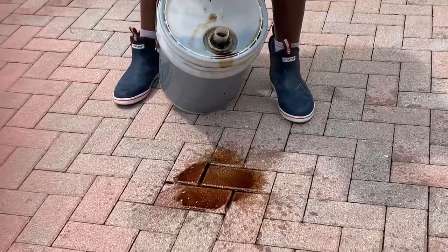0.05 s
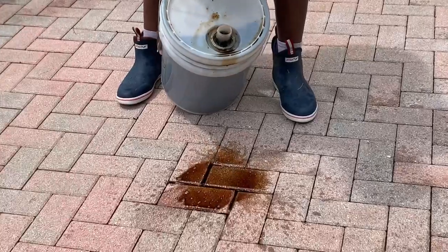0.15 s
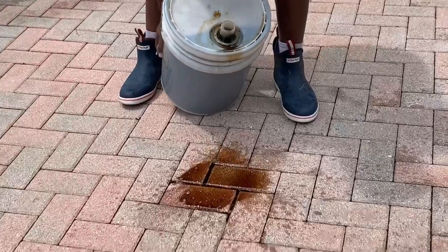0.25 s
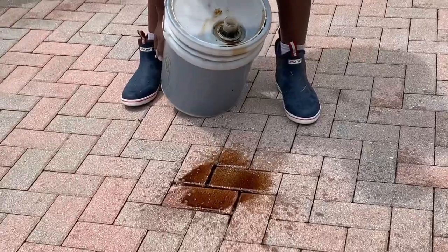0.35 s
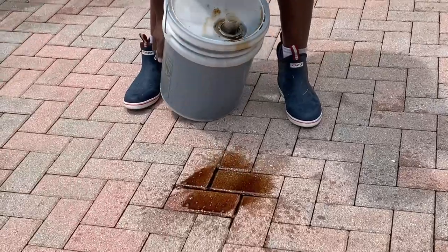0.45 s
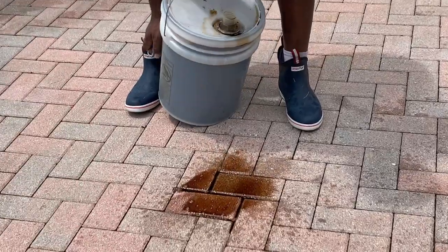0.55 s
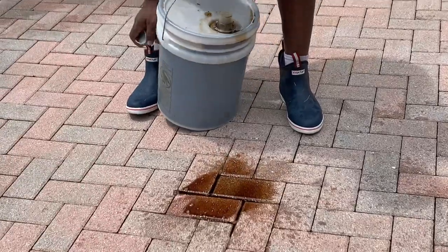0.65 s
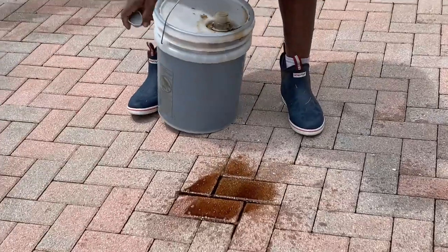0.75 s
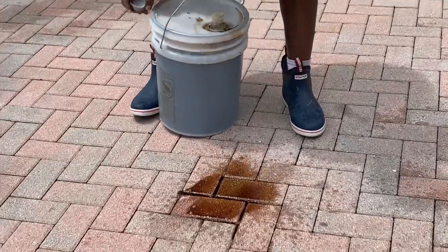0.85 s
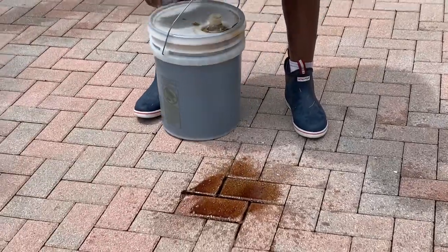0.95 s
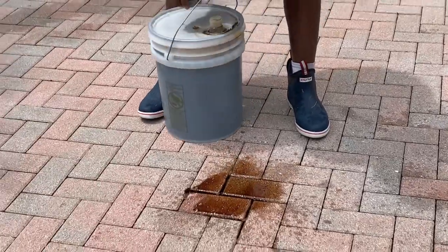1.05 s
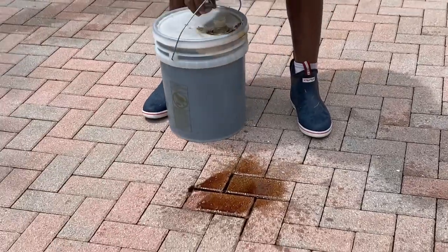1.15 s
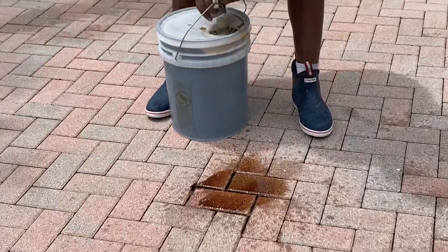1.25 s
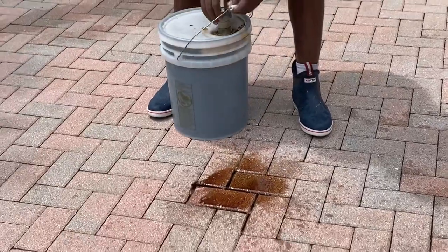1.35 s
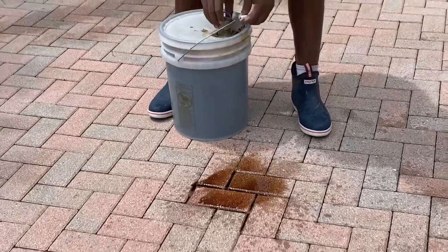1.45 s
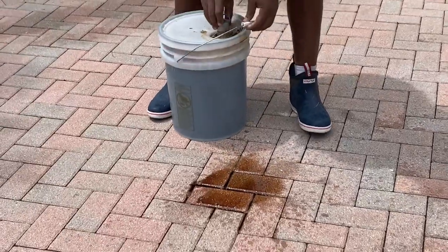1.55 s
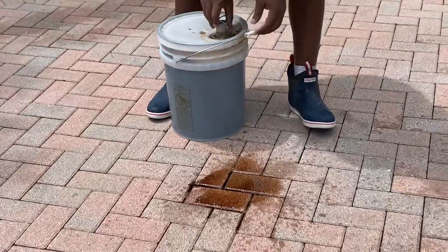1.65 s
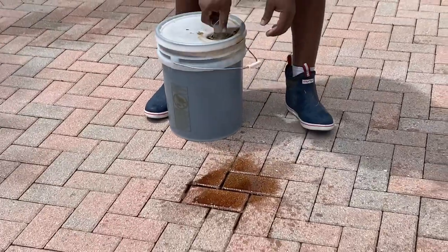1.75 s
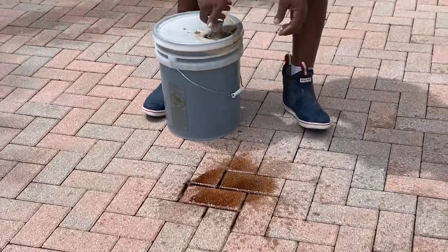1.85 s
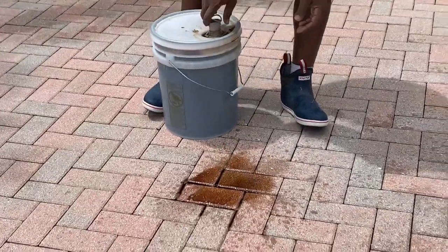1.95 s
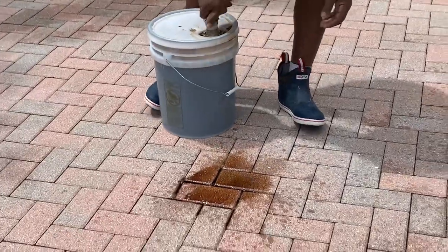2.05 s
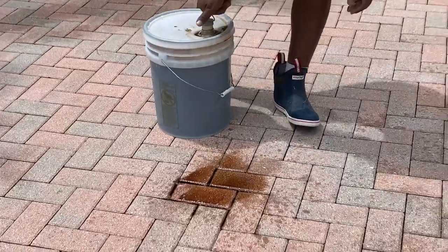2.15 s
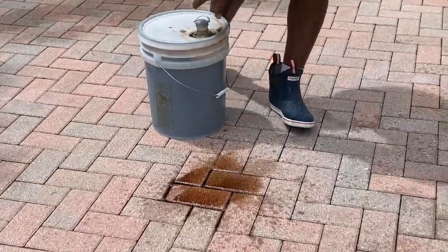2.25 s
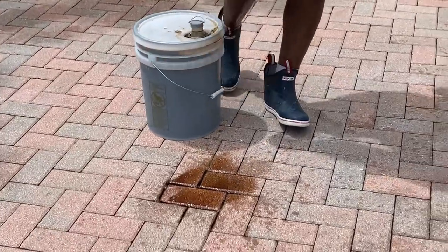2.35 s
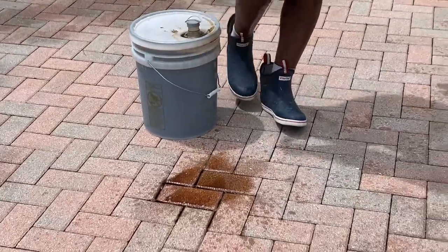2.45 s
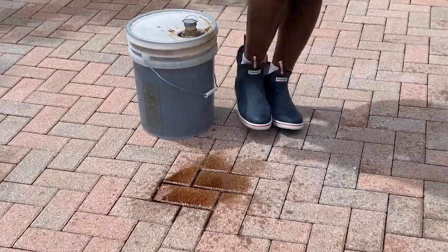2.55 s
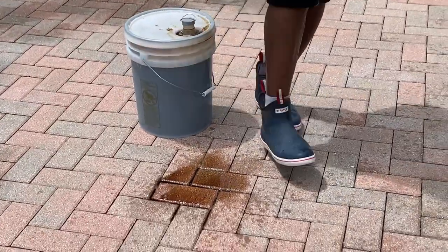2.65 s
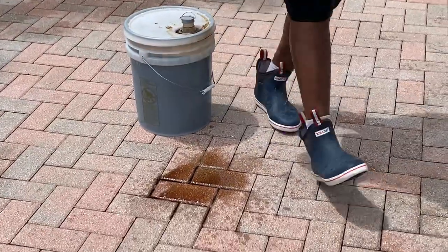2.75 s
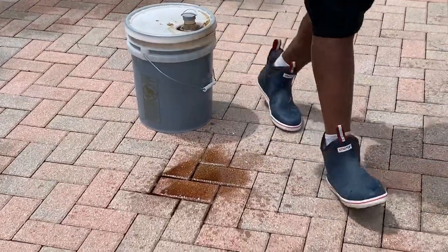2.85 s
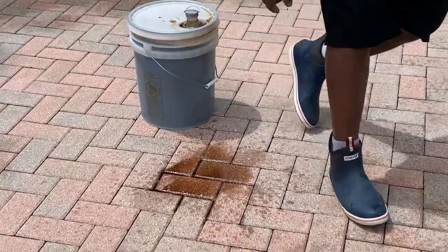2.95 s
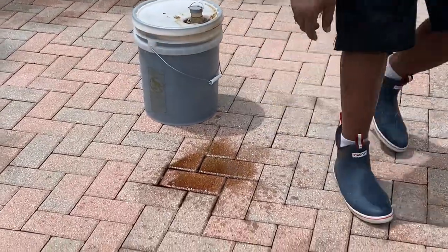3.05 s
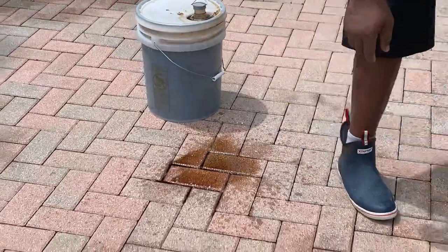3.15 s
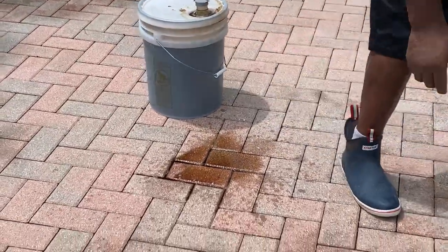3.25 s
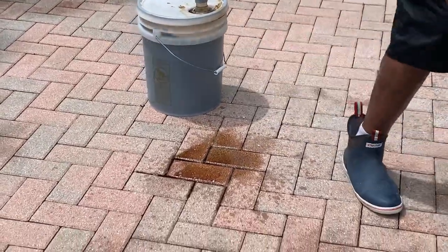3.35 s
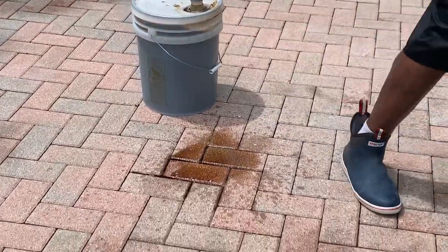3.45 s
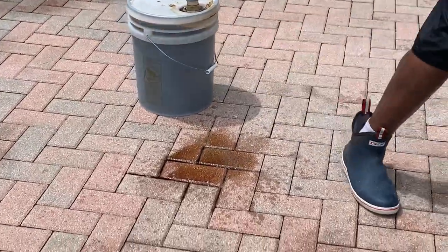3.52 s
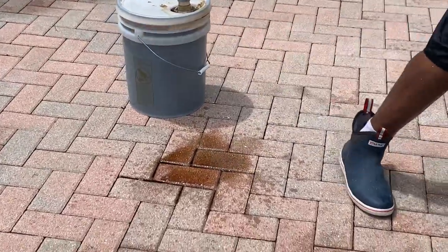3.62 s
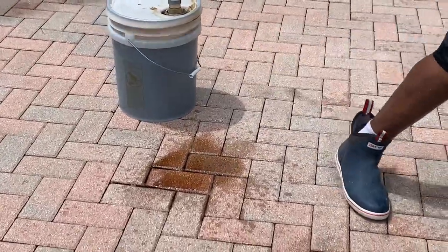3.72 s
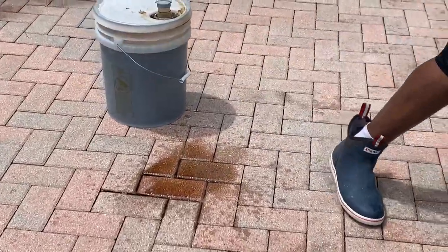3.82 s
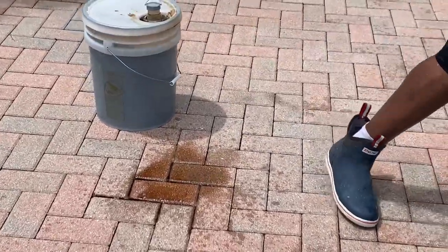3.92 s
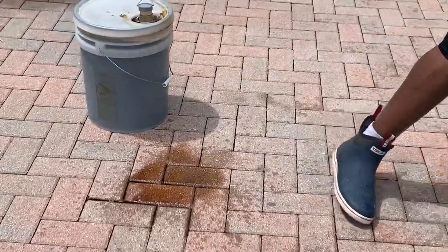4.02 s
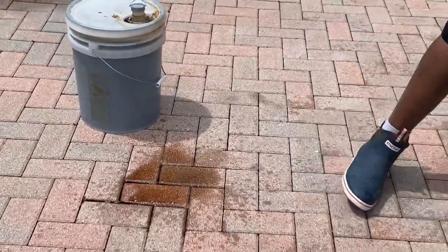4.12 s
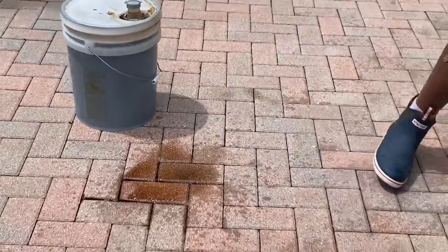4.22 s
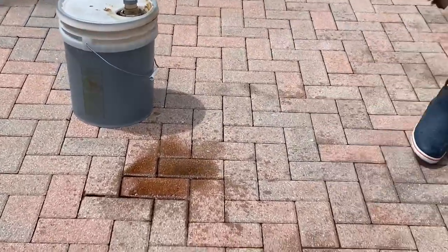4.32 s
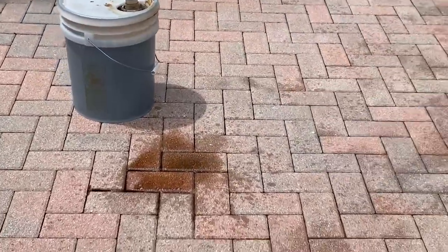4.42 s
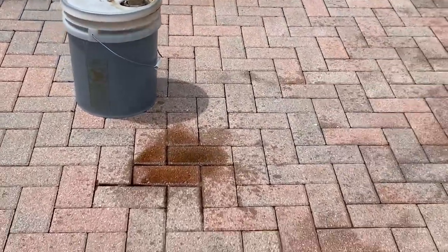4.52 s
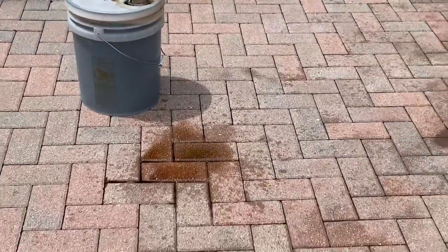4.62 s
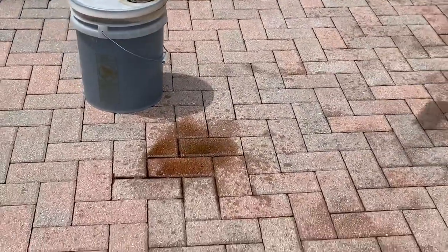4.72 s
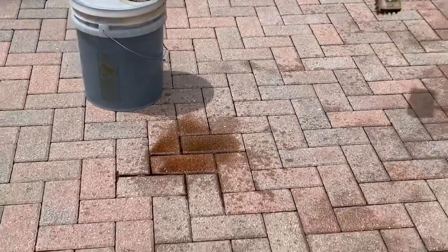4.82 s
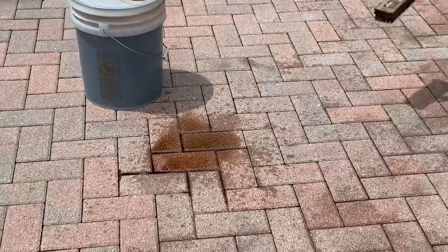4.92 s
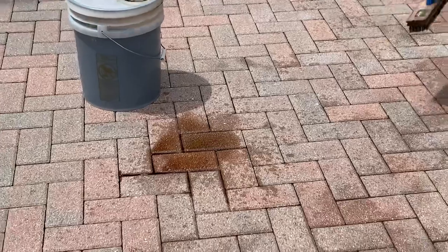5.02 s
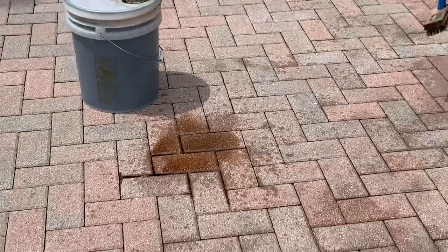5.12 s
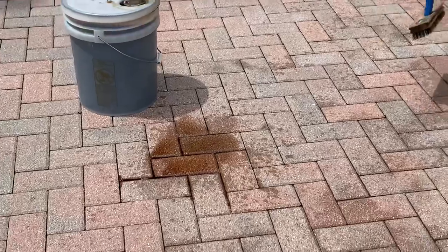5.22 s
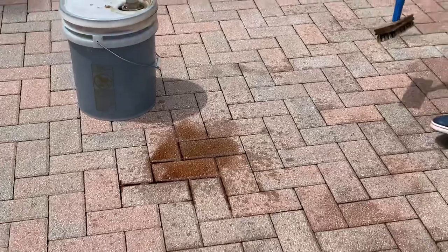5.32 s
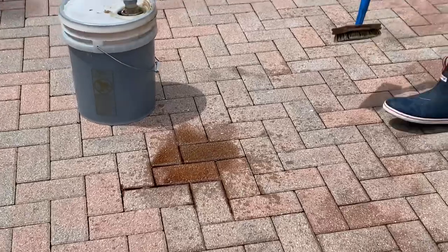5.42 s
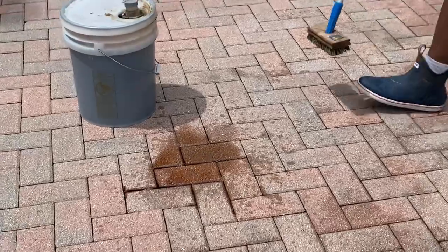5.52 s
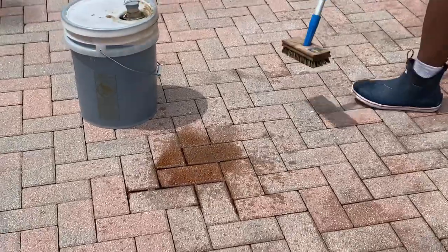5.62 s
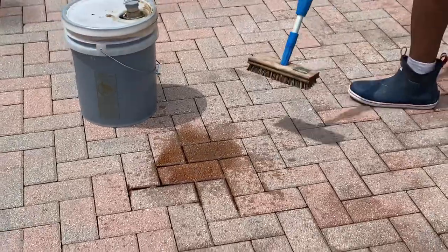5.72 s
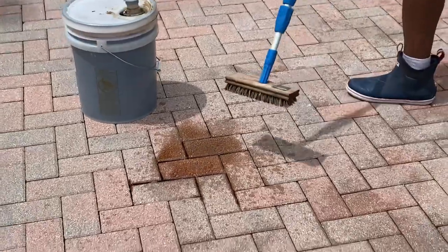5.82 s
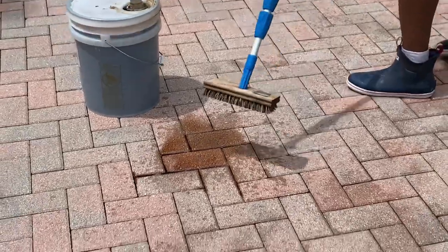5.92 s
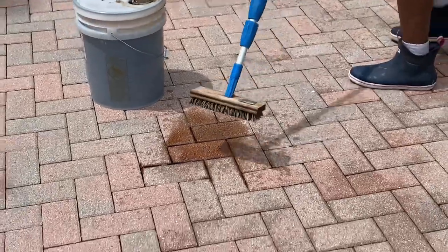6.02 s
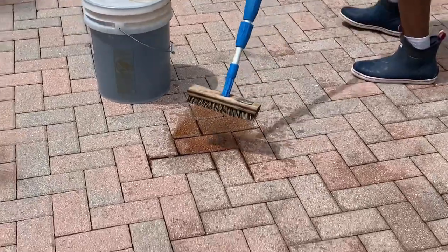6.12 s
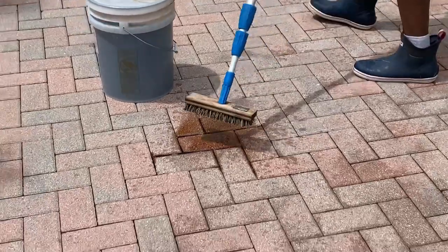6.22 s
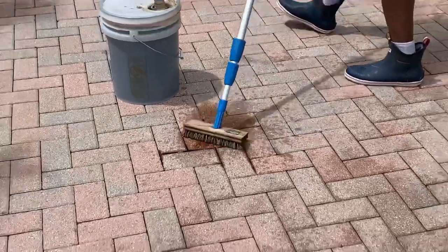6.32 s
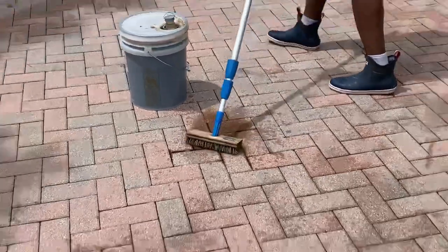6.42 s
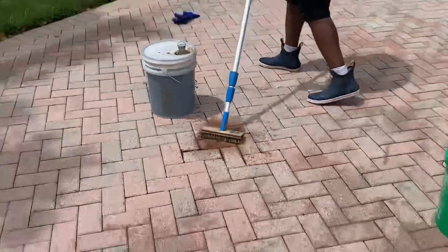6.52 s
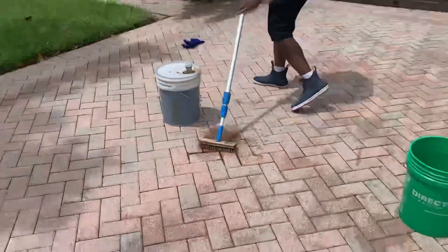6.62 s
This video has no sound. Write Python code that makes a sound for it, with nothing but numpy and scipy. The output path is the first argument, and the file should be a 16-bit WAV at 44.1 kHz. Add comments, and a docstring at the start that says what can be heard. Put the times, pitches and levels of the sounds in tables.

```python
"""A brick-paved yard, hand-held microphone: far off a small engine hums in low exhaust orders over a wash.
Air buffets the microphone as lumpy low noise, and its two ports hear the treble out of step.
Close by, rubber boots roll grit and thump. A plastic bucket lands and rings in its modes, its wire handle
chatters on the wall and its spout is pulled out.
Last, a stiff deck brush lands and scrubs in quick strokes: hiss of flicking tips over a rasp of brick."""
import sys
import numpy as np
from scipy import signal
from scipy.fft import rfft, irfft
from scipy.io import wavfile

SR = 44100
rng = np.random.default_rng(int(sys.argv[2]) if len(sys.argv) > 2 else 0)


def store_wav(level_fs):
    """Save 16-bit WAV to argv[1]."""
    pcm = np.round(np.clip(np.atleast_2d(level_fs), -1, 1) * 32767)
    wavfile.write(sys.argv[1], SR, pcm.T.astype(np.int16))


N = 294147
TIME = np.arange(N) / SR
FREQS = np.maximum(np.arange(N // 2 + 1) * SR / N, 1)


def from_db(db):
    """Decibels to gain."""
    return 10 ** (np.asarray(db) / 20)


def rms_one(x):
    """Scale to unit power."""
    return x / np.sqrt(np.mean(x ** 2) + 1e-20)


def in_time(rows):
    """The second column of a time curve, sample by sample."""
    s, value = np.transpose(rows)
    return np.interp(TIME, s, value)


def per_bin(points):
    """A table read along log frequency."""
    hz, value = np.transpose(points)
    return np.interp(np.log(FREQS), np.log(hz), value)


def drift(rate):
    """Random wander: straight lines between knots of spread 1, `rate` knots a second."""
    knots = rng.standard_normal(2000)
    return np.interp(TIME * rate, np.arange(2000), knots)


# how alike the two ports hear diffuse sound: f/Hz, likeness (1 = the same)
PORT_LIKENESS = [(60, 0.91), (150, 0.64), (300, 0.32), (600, 0.54), (1200, 0.0074), (2500, 0.1),
                 (5000, 0.039), (7800, 1), (16000, 1)]


def colour(pair, spectrum):
    """Two unrelated signals become a stereo sound with this spectrum; rms 1."""
    mid, side = rfft(pair) * from_db(per_bin(spectrum))
    alike = np.clip(per_bin(PORT_LIKENESS), -1, 1)
    shared = np.sqrt(1 + alike) * mid
    opposed = np.sqrt(1 - alike) * side * [[1], [-1]]
    return rms_one(irfft(shared + opposed, N))


def noise(spectrum):
    """Smooth stereo noise."""
    return colour(rng.standard_normal((2, N)), spectrum)


def grains(per_s):
    """Random tiny impacts of uneven size."""
    born = rng.random(N) < per_s / SR
    return born * rng.standard_normal((2, N))


def strikes(times, gains):
    """One click at each time."""
    out = np.zeros(N)
    out[np.round(np.asarray(times) * SR).astype(int)] = gains
    return out


def ring(clicks, hz, t60):
    """A unit click sets a decaying sine of starting height 1 ringing in a two-pole resonator."""
    r = from_db(-60 / (t60 * SR))
    w = 2 * np.pi * hz / SR
    return signal.lfilter([0, np.sin(w)], [1, -2 * r * np.cos(w), r * r], clicks + 1e-18)


def fade(clicks, t60):
    """An envelope that jumps at each click and dies away."""
    return signal.lfilter([1], [1, -from_db(-60 / (t60 * SR))], clicks + 1e-18)


def low_rings(rows, t60):
    """Mono low tones, one for each row of t/s, level/dB, f/Hz."""
    return sum(ring(strikes([s], from_db(db)), hz, t60) for s, db, hz in rows)


def soften(x, low_hz=42, soft_hz=420):
    """A soft, heavy contact passes only its lows."""
    return signal.sosfilt(signal.butter(2, [low_hz, soft_hz], "band", fs=SR, output="sos"), x)


def slides(rows, skirt, flatness):
    """Hiss and rasp envelopes of sliding contacts: each speeds up, slows down and trails off."""
    hiss, rasp = np.zeros(N), np.zeros(N)
    for s, rise, fall, hiss_db, rasp_db in rows:
        away = np.abs(TIME - s) / np.where(TIME < s, rise, fall)
        power = (1 + skirt * away ** flatness) ** (-1 / skirt)
        hiss += from_db(hiss_db) ** 2 * power
        rasp += from_db(rasp_db) ** 2 * power
    return np.sqrt(hiss), np.sqrt(rasp)


def glides(rows, width):
    """Uneven bands of noise, `width` a share of the centre pitch, that swell, glide and fade."""
    out = np.zeros((2, N + SR))
    t = TIME[:SR] - TIME[SR // 2]
    for s, half, db, hz, rise in rows:
        lowpass = signal.butter(2, width * hz / 2, fs=SR, output="sos")
        slip = rms_one(signal.sosfilt(lowpass, rng.standard_normal((3, SR))))
        carrier = np.sin(2 * np.pi * hz * (t + rise * t * t / half / 2))
        band = slip * carrier * np.exp(-(t / half) ** 2 / 2)
        start = round(s * SR)
        out[:, start:start + SR] += from_db(db) * (band[0] + band[1:])   # half shared, half each port's own
    return out[:, SR // 2:SR // 2 + N]


def struck(hits, modes):
    """A small body rings at each hit, a little differently in each port."""
    s, hit_db = np.transpose(hits)
    uneven = from_db(rng.normal(0, 0.74, (len(modes), 2, len(s))))
    out = np.zeros((2, N))
    for (hz, db, t60), ports in zip(modes, uneven):
        for side, port in enumerate(ports):
            out[side] += ring(strikes(s, from_db(hit_db + db) * port), hz, t60)
    return out


# bright crack of a hard contact: f/Hz, relative level/dB per Hz
CRACK_SPECTRUM = [(300, -22), (900, -46), (2200, -9), (3300, 1), (5000, -9), (7300, 1), (8500, 10.5),
                  (10500, 4.5), (12000, 9.5), (13500, 9.5), (15000, 7.5), (16000, -33)]
# duller body of the same contact: f/Hz, relative level/dB per Hz
DULL_SPECTRUM = [(150, -7), (400, -10), (800, 2), (1200, 2.5), (1600, -4), (2200, 3.5), (3200, -3.5),
                 (5000, -5), (7000, -12), (15000, -36)]


def contacts(rows, crack_t60, dull_t60, snap_db=12, burst_t60=0.005, burst_db=-3,
             rattle_t60=0.085, rattle_db=-19, crack_db=-7):
    """Each contact is one sharp snap, a burst that cracks and rattles briefly, and a duller knock."""
    s, bright_db, dull_db = np.transpose(rows)
    hits = strikes(s, from_db(bright_db))
    shape = from_db(per_bin(CRACK_SPECTRUM))
    snap = from_db(snap_db) * irfft(rfft(hits) * shape / shape.mean(), N)
    bright = from_db(burst_db) * fade(hits, burst_t60)
    bright += from_db(crack_db) * fade(hits, crack_t60)
    bright += from_db(rattle_db) * fade(hits, rattle_t60)
    dull = fade(strikes(s, from_db(dull_db)), dull_t60)
    return snap + noise(CRACK_SPECTRUM) * bright + noise(DULL_SPECTRUM) * dull


# distant wash of the neighbourhood: f/Hz, relative level/dB per Hz
WASH_SPECTRUM = [(30, -22), (110, 10), (220, 13), (330, 8.5), (430, 3.5), (700, 5), (1000, -0.5),
                 (2200, -2), (3200, -10), (5000, -13), (7500, -19.5), (9000, -21.5), (12000, -25.5),
                 (16000, -30)]
# its course: t/s, level/dB
WASH_COURSE = [(0, -49.5), (1.6, -49.5), (2.4, -51.5), (3.3, -52), (4.3, -50), (6.0, -51), (6.45, -47),
               (6.67, -47.5)]


def neighbourhood(waver_db=1.0, mottle_db=1.5, split_low_hz=800, split_high_hz=2800):
    """A distant wash of noise whose lows, mids and highs waver apart."""
    wash = noise(WASH_SPECTRUM)
    lows = signal.sosfiltfilt(signal.butter(2, split_low_hz, fs=SR, output="sos"), wash)
    below_highs = signal.sosfiltfilt(signal.butter(2, split_high_hz, fs=SR, output="sos"), wash)
    bands = (lows, below_highs - lows, wash - below_highs)
    mottled = sum(band * from_db(mottle_db * drift(12)) for band in bands)
    return from_db(in_time(WASH_COURSE) + waver_db * drift(10)) * mottled


# narrow low tones in the background:
# t/s, half length/s, level/dB, centre f/Hz, rise per half length as a share of the centre
LOW_TONES = [(3.35, .13, -48, 232.7, -0.025), (3.45, 0.45, -44.5, 184.7, -0.015),
             (5.72, 0.121, -39.5, 191.5, -.06), (5.76, .05, -51, 306, -0.0041),
             (5.98, 0.065, -50, 259, 0.025), (6.13, 0.072, -42.5, 232, -0.00075)]


def low_swells():
    """Narrow bands of low noise swell briefly in the background, the same in both ports."""
    return glides(LOW_TONES, width=0.086).mean(axis=0)


# far engine's turning rate: t/s, turns per second
TURN_RATE = [(0, 52.9), (.4, 52.94), (1.0, 52.34), (1.7, 52.28), (2.05, 51.96), (2.55, 52.01), (3.1, 52.73),
             (3.5, 53.39), (5.1, 53.41), (5.8, 52.39), (6.67, 52.64)]
# orders 2 to 6 of the turning rate, each swelling and fading at its own pace: t/s, level/dB
SECOND_ORDER_HUM = [(0, -38), (.2, -35.5), (.8, -39), (1.4, -42.5), (2.85, -38), (3.35, -45), (3.7, -43.5),
                    (4.05, -40.5), (4.4, -32.5), (5.05, -32.5), (5.75, -52), (6.25, -38), (6.67, -43.5)]
THIRD_ORDER_HUM = [(0, -47), (.25, -46), (.95, -47), (1.22, -55), (1.6, -46.5), (2.45, -41), (2.85, -45.5),
                   (3.15, -61), (3.7, -44.5), (4.4, -58), (4.85, -42.5), (5.4, -48), (5.8, -50.5),
                   (6.67, -65)]
FOURTH_ORDER_HUM = [(0, -66), (.6, -72), (1.6, -48), (2.4, -63), (2.85, -46.5), (3.2, -41.5), (3.9, -56.5),
                    (4.45, -51.5), (4.8, -68), (6.25, -48), (6.67, -53.5)]
FIFTH_ORDER_HUM = [(0, -54.5), (.6, -51.5), (1.2, -56), (1.6, -52), (2.3, -64), (2.7, -54), (3.4, -62.5),
                   (4.2, -60.5), (4.8, -53), (5.4, -56.5), (6.67, -59)]
SIXTH_ORDER_HUM = [(0, -64), (.3, -50), (.8, -47.5), (1.3, -58.5), (1.75, -60), (1.98, -50.5), (2.45, -48),
                   (3.1, -54.5), (3.5, -61.5), (3.85, -55), (4.3, -67.5), (4.65, -49), (5.05, -51),
                   (5.5, -55), (6.35, -61.5), (6.6, -50)]
# weak exhaust orders without a course of their own: multiple of the turning rate, level/dB
WEAK_ORDERS = [(1.5, -59), (2.5, -54.5), (3.5, -57), (4.5, -60.5), (5.5, -64), (6.5, -62.5), (7, -72),
               (8, -71.5)]


def engine(hum_waver_db=1.0, waver_db=2.3, wobble=0.043, smear=1.0):
    """Only the low orders of the exhaust pulses carry this far; they waver in the moving air."""
    turn = 2 * np.pi * np.cumsum(in_time(TURN_RATE)) / SR
    courses = [(2, SECOND_ORDER_HUM), (3, THIRD_ORDER_HUM), (4, FOURTH_ORDER_HUM),
               (5, FIFTH_ORDER_HUM), (6, SIXTH_ORDER_HUM)]
    orders = [(k, in_time(course) + hum_waver_db * drift(9)) for k, course in courses]
    orders += [(k, db + waver_db * drift(2.52)) for k, db in WEAK_ORDERS]
    hum = np.zeros(N)
    for k, db in orders:
        # smear and wobble, in radians, leave the orders roughly in step, so the hum throbs
        hum += from_db(db) * np.sin(k * turn + smear * rng.normal() + wobble * drift(25))
    return np.sqrt(2) * hum


def yard(x, t60=0.13, wet_db=-17, dull_hz=5000):
    """Weak, dull scatter from walls and ground."""
    t = TIME[:SR // 2]
    scatter = rng.standard_normal((2, len(t))) * from_db(-60 * t / t60) * (t > .006)
    scatter = signal.sosfilt(signal.butter(1, dull_hz, fs=SR, output="sos"), scatter)
    echo = rms_one(scatter) / np.sqrt(len(t))
    return from_db(wet_db) * signal.fftconvolve(x, echo, axes=1)[:, :N]


# wind on the microphone: f/Hz, relative level/dB per Hz
WIND_SPECTRUM = [(20, -27), (35, -18), (50, 0.5), (65, -1.5), (90, 3.5), (130, -1.5), (200, -14),
                 (300, -18.5), (500, -35.5), (1000, -101)]
# calm at first, then a long gust: t/s, level/dB before a small lift
WIND_COURSE = [(0, -49), (1.2, -44.5), (2.3, -47), (2.75, -46.5), (3.2, -45.5), (4.3, -41), (4.65, -37.5),
               (5.45, -37), (5.85, -40.5), (6.15, -38.5), (6.67, -40)]


def wind(lift_db=1.0, lump_db=0.36):
    """Air buffets the two ports as lumpy low noise."""
    return from_db(in_time(WIND_COURSE) + lift_db + lump_db * drift(7.3)) * noise(WIND_SPECTRUM)


# fingers on the microphone case: t/s, level/dB
CASE_TAPS = [(0.2138, -35), (3.3134, -36.5), (3.399, -45), (3.815, -42.5), (6.034, -40), (6.072, -33.5),
             (6.134, -30.5)]


def taps(start_hz=1000, end_hz=130, glide_s=0.00307, decay_s=0.018, attack_s=0.0011):
    """A tap on the case is a tiny falling chirp: its lows arrive last."""
    t = TIME[:SR // 10]
    hz = end_hz + (start_hz - end_hz) * np.exp(-t / glide_s)
    envelope = np.exp(-t / decay_s) * (1 - np.exp(-t / attack_s))
    chirp = np.sin(2 * np.pi * np.cumsum(hz) / SR) * envelope
    s, db = np.transpose(CASE_TAPS)
    return signal.fftconvolve(strikes(s, from_db(db)), chirp / np.abs(chirp).max())[:N]


# heels and gusts: t/s, level/dB before softening, f/Hz
LOW_THUMPS = [(3.03, -29, 81), (3.315, -32, 137), (3.325, -39, 62), (3.767, -27.5, 138), (4.665, -15, 56),
              (5.18, -23, 74), (5.442, -15.5, 64), (5.514, -14.5, 67.5), (5.522, -24.5, 160),
              (6.077, -25, 116), (6.144, -22.5, 55)]


def thumps():
    """Soft, heavy contacts ring low for a few cycles."""
    return soften(low_rings(LOW_THUMPS, t60=0.12))


DRAG_S, DRAG_ATTACK_S, DRAG_HOLD_S, DRAG_RELEASE_DB_PER_S = 5.506, .012, 0.13, 80


def drag():
    """Pressure of a dragged sole: it bites at once, holds, then eases off."""
    after = TIME - DRAG_S
    release = from_db(-DRAG_RELEASE_DB_PER_S * np.maximum(after - DRAG_HOLD_S, 0))
    return np.clip(after / DRAG_ATTACK_S, 0, 1) * release


# whole sole over brick: f/Hz, relative level/dB per Hz
SCRAPE_SPECTRUM = [(200, -24), (600, 1.5), (1100, -2.5), (1600, -3), (2400, 2), (3400, -1), (5000, -5.5),
                   (7200, -9), (9000, -9), (12000, -16), (16000, -33)]


def scrape(bumps_per_s=6000, rasp_db=-42.5):
    """The dragged sole grinds grit against the brick."""
    return from_db(rasp_db) * drag() * colour(grains(bumps_per_s), SCRAPE_SPECTRUM)


# rubber and plastic on brick:
# t/s, half length/s, level/dB, centre f/Hz, rise per half length as a share of the centre
BRICK_RUBS = [(0.476, 0.054, -58, 2276, 0.029), (0.715, 0.012, -57, 1056, 0.087),
              (0.794, 0.0064, -47, 1450, 0.17), (1.09, 0.03, -57, 2190, 0.012),
              (3.41, 0.008, -49, 480, -0.02), (3.507, 0.0029, -51, 1080, 0.11),
              (3.507, 0.0046, -45.5, 537, 0.011), (3.659, 0.0034, -53, 2540, 0.0011),
              (4.14, 0.02, -56, 1400, 0.02), (4.16, 0.028, -56, 2200, 0.02),
              (4.554, 0.0049, -46.5, 3710, 0.105), (5.053, 0.0072, -47, 2264, 0.17),
              (5.645, 0.038, -51, 2475, 0.016), (6.225, 0.0235, -53, 1198, 0.081)]


def rubs():
    """Rubber and plastic stick and slip on brick: a hoarse, wide band that glides."""
    return glides(BRICK_RUBS, width=0.34)


# grit under the boots and the brush: t/s, relative crack level/dB, dull level/dB
GRIT_TICKS = [(0.786, -54, -44), (2.464, -57, -48), (3.504, -62, -45), (3.775, -64, -52), (3.599, -52, -65),
              (4.015, -65, -47), (4.553, -48, -43), (5.057, -48, -43.5), (5.423, -48, -43),
              (6.018, -51, -52), (6.279, -28.5, -49)]


def ticks(t60=.04):
    """Grit gives dry ticks, each a snap and a duller knock."""
    return contacts(GRIT_TICKS, crack_t60=t60, dull_t60=t60, snap_db=14)


# soles shifting on the pavers: t/s at full speed, rise/s, hiss level/dB
SOLE_SCUFFS = [(0.715, 0.012, -54), (0.799, 0.015, -53), (1.045, 0.037, -56.5), (1.95, 0.13, -56.5),
               (2.22, 0.034, -62.5), (2.52, 0.038, -56.5), (2.93, 0.044, -56.5), (3.395, 0.032, -58),
               (3.84, 0.024, -58.5), (4.155, 0.025, -56.5), (4.44, 0.013, -59), (4.53, 0.04, -55.5),
               (4.70, 0.015, -59), (5.075, 0.03, -62.5), (5.19, 0.013, -58.5), (5.36, 0.014, -56.5),
               (5.995, 0.016, -58.5)]
# rolling sand: f/Hz, relative level/dB per Hz
SAND_SPECTRUM = [(1000, -1.5), (3000, -21), (7300, -15.5), (8700, -1.5), (11000, -5), (13000, -5.5),
                 (16000, -8)]
# rough brick, under soles and bristles alike: f/Hz, relative level/dB per Hz
BRICK_SPECTRUM = [(200, -53), (600, 4.5), (1100, -2), (1600, 1), (2400, 1.5), (3900, 3), (5300, -8.5),
                  (7200, 0), (9000, -37), (15000, -28)]
SCUFF_FALL_RATIO = 1.31   # a scuff dies more slowly than it starts
# a light scuff, and dB of rasp gained per dB of hiss as the weight comes on
LIGHT_SCUFF_DB, LIGHT_RASP_DB, RASP_GROWTH = -56.5, -59, 3.1


def boots(grit_per_s=8000, bumps_per_s=3500, judder_db=2.5, pan_db=0.1,
          shuffle_db=-75, shuffle_swing_db=3, drag_hiss_db=-53):
    """Rubber soles roll sand over the pavers and rasp more under weight; a faint shuffle runs throughout."""
    scuffs = []
    for s, rise, hiss_db in SOLE_SCUFFS:
        rasp_db = LIGHT_RASP_DB + RASP_GROWTH * (hiss_db - LIGHT_SCUFF_DB)
        scuffs.append((s, rise, SCUFF_FALL_RATIO * rise, hiss_db, rasp_db))
    hiss, rasp = slides(scuffs, skirt=0.49, flatness=2.5)
    shuffle = from_db(shuffle_db + shuffle_swing_db * drift(7.2))
    hiss = np.hypot(hiss, shuffle + from_db(drag_hiss_db) * drag())
    sand = hiss * colour(grains(grit_per_s), SAND_SPECTRUM) * from_db(judder_db * drift(120))
    brick = rasp * colour(grains(bumps_per_s), BRICK_SPECTRUM) * from_db(judder_db * drift(90))
    return sand + brick * from_db([[pan_db], [-pan_db]])


# liquid moving in the bucket: t/s, level/dB before softening, f/Hz
LIQUID_GULPS = [(1.825, -35, 288), (1.916, -30, 191.3), (2.13, -36.5, 183), (2.155, -33.5, 246.4)]


def slosh():
    """The liquid in the bucket gulps in low, decaying tones."""
    return soften(low_rings(LIQUID_GULPS, t60=0.22))


# the full bucket lands on one edge, settles flat and rocks once: t/s, relative level/dB
LANDINGS = [(1.000, -26), (1.0117, -20.5), (1.0328, -33), (1.088, -31.5)]
# its heavy low modes: f/Hz, relative level/dB, t60/s
BOOM_MODES = [(96.4, 2, 0.15), (130, -4.5, 0.17), (194, -5, 0.2), (242, -20, .12), (282, -14, 0.23),
              (369, -16.5, 0.22)]


def landing():
    """The full bucket booms in its low modes as it lands."""
    s, landing_db = np.transpose(LANDINGS)
    return soften(sum(ring(strikes(s, from_db(landing_db + db)), hz, t60) for hz, db, t60 in BOOM_MODES))


# the rim settling on the brick: t/s, relative level/dB
RIM_HITS = [(0.995, -43.5), (1.006, -45), (1.017, -44), (1.049, -39.5), (1.07, -50)]
# the rim: f/Hz, relative level/dB, t60/s
RIM_MODES = [(410, -3, .05), (606, -1, 0.039), (800, -8, 0.05), (1033, -1, 0.044), (1660, -8, 0.041),
             (4040, -5, 0.015)]


def rim():
    """The bucket's rim clacks on the brick and rings in its own modes."""
    return struck(RIM_HITS, RIM_MODES)


def chatter(start_s=1.823, gap_s=0.0065, loss_db_per_s=232, crack_db=-49, body_db=-35,
            count=9, jitter_s=0.0008, uneven_db=2):
    """The dropped wire handle bounces on the wall in a quick, uneven run of weakening knocks."""
    early, force = rng.standard_normal((count, 2)).T
    after = gap_s * np.arange(count) + jitter_s * early
    loss_db = loss_db_per_s * after + uneven_db * force
    return np.transpose([start_s + after, crack_db - loss_db, body_db - loss_db])


def spout(pull_s=2.08, half_s=.08, level_db=-51, slips_per_s=70):
    """Tiny uneven slips of plastic on plastic as the spout is pulled out of the lid."""
    pull = np.exp(-((TIME - pull_s) / half_s) ** 2 / 2)
    return grains(slips_per_s)[0] * from_db(level_db) * pull


# the bucket, its wire handle and its cap: t/s, relative crack level/dB, plastic body level/dB
BUCKET_KNOCKS = [(0.9950, -30.5, -46), (1.0178, -33, -52), (1.366, -66, -41), (1.553, -72, -53),
                 (1.7234, -47, -53), (1.787, -65.5, -45.5), (1.811, -33, -32), (1.8135, -40, -38.5),
                 (1.817, -29, -39), (1.8198, -19, -30.5), (1.8255, -29, -32), (1.8353, -27, -42),
                 (1.841, -35, -37), (1.8665, -35.5, -40.5), (1.892, -46, -44), (1.972, -65, -44),
                 (2.0595, -41.5, -44)]
# the bucket wall: f/Hz, relative level/dB, t60/s
WALL_MODES = [(650, -5, .06), (836, 0, 0.072), (1154, 4, .06), (1215, 9, .06), (1320, 4, .04),
              (1650, -1, 0.056), (1992, 5, 0.044), (2130, 5, .06), (2240, 5, 0.051), (2590, 2, .09),
              (2920, -1, .04), (3900, -1, 0.063), (4840, -8, 0.058), (5450, -15, .09)]


def knocks(ring_db=-14.5, wall_flex=.025):
    """Knocks ring the bucket's modes unevenly, detuned as the wall flexes; the slipping spout rings them too."""
    rows = np.vstack([BUCKET_KNOCKS, chatter()])
    out = contacts(rows, crack_t60=0.024, dull_t60=0.03, snap_db=13.5)
    hz, db, t60 = np.transpose(WALL_MODES)
    t = TIME[:SR // 4, None]
    decay = np.exp(-np.log(1000) * t / t60)
    for s, _, body_db in rows:
        pitches = hz * (1 + wall_flex * rng.standard_normal(len(hz)))
        tones = np.sin(2 * np.pi * pitches * t) * decay
        uneven = from_db(rng.normal(0, 2.5, (2, len(hz)))) * rng.choice([-1, 1], (2, len(hz)))
        start = round(s * SR)
        out[:, start:start + len(t)] += (uneven * from_db(body_db + db + ring_db)) @ tones.T
    slips = spout()
    creak = sum(from_db(level + ring_db) * ring(slips, pitch, t60) for pitch, level, t60 in WALL_MODES)
    return out + creak


# the brush head landing: t/s, relative level/dB
HEAD_LANDINGS = [(6.279, -33), (6.2812, -37)]
# its hard block: f/Hz, relative level/dB, t60/s
HEAD_MODES = [(1530, -4.5, 0.034), (2630, -13, .009), (3350, -8, 0.011), (4180, -2.5, 0.021),
              (5100, -1, 0.013), (7000, 7, 0.011)]


def brush_head():
    """The hard block of the brush rings briefly as it lands."""
    return struck(HEAD_LANDINGS, HEAD_MODES)


# strokes back and forth: t/s at full speed, bristle hiss level/dB, brick rasp level/dB
BRUSH_STROKES = [(6.318, -33, -59), (6.46, -29, -49.5), (6.587, -28, -40.5), (6.716, -28, -59)]
# flicking bristle tips: f/Hz, relative level/dB per Hz
BRISTLE_SPECTRUM = [(1000, -65), (3500, -9), (6000, -9), (7500, -5.5), (9500, -0.5), (12500, 1.5),
                    (14800, 4), (16000, -7)]


def brush(flicks_per_s=22000, bumps_per_s=2600, chatter_db=1.8, judder_db=2.5,
          rise_s=0.024, fall_s=0.025, lands_s=6.279, early_db=-14):
    """Bristle tips catch and flick free, in tufts; bumps in the rough brick add a coarser, lower rasp."""
    strokes = [(s, rise_s, fall_s, hiss_db, rasp_db) for s, hiss_db, rasp_db in BRUSH_STROKES]
    hiss, rasp = slides(strokes, skirt=0.59, flatness=3.27)
    hiss = hiss * np.where(TIME < lands_s, from_db(early_db), 1)   # only a few tips touch before the head lands
    tips = hiss * colour(grains(flicks_per_s), BRISTLE_SPECTRUM) * from_db(chatter_db * drift(240))
    brick = rasp * colour(grains(bumps_per_s), BRICK_SPECTRUM) * from_db(judder_db * drift(220))
    return tips + brick


def scene():
    """Work on the pavers close by, engine and neighbourhood behind it, wind and fingers on the microphone."""
    far = neighbourhood() + low_swells() + engine()
    microphone = wind() + taps()
    feet = boots() + scrape() + rubs() + ticks()
    bucket = knocks() + rim()
    near = feet + bucket + brush() + brush_head()
    heavy = thumps() + slosh() + landing()
    return far + microphone + heavy + near + yard(near)


# phase between the ports: f/Hz, left's lead/rad
PHASE_LEAD = [(10, 0), (4500, 0), (6800, -.8), (8400, -3.14), (11000, -6.3), (13500, -9.4), (16000, -12.6)]
# level between the ports: f/Hz, left over right/dB
LEFT_OVER_RIGHT = [(300, 0), (700, 1.5), (1300, 0.6), (2400, 0), (4400, -3.5), (7500, -0.5)]


def record(dry, cutoff_hz=15900, opening_s=.006):
    """The two ports colour and shift the treble against each other; the sound opens softly, the top is cut."""
    phase = np.interp(FREQS, *np.transpose(PHASE_LEAD))
    sides = np.array([[.5], [-.5]])   # each port takes half the difference
    response = np.exp(1j * phase * sides) * from_db(per_bin(LEFT_OVER_RIGHT) * sides)
    ports = irfft(rfft(dry) * response, N) * np.minimum(TIME / opening_s, 1)
    return signal.sosfilt(signal.ellip(10, .2, 80, cutoff_hz, fs=SR, output="sos"), ports)


dry = scene()
out = record(dry)
store_wav(out)
```